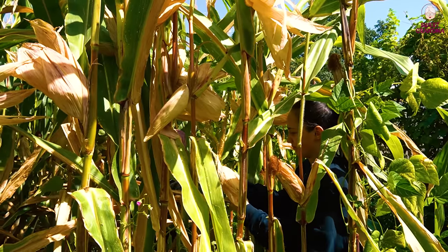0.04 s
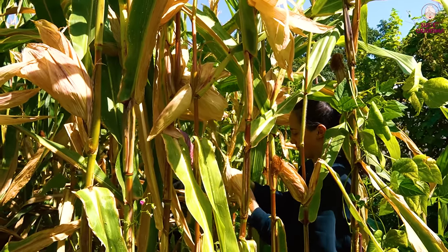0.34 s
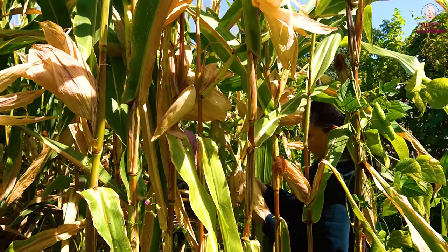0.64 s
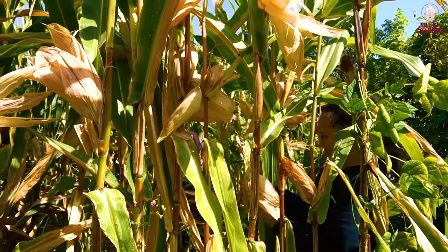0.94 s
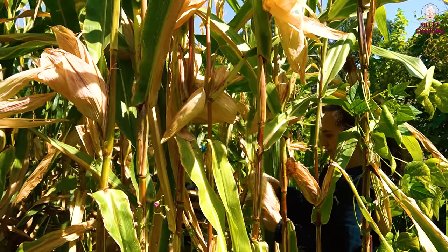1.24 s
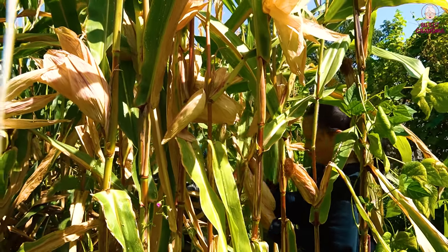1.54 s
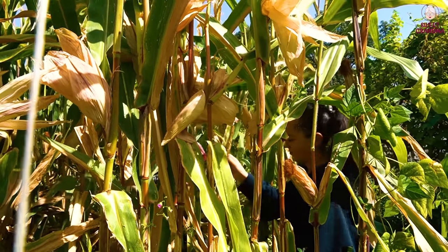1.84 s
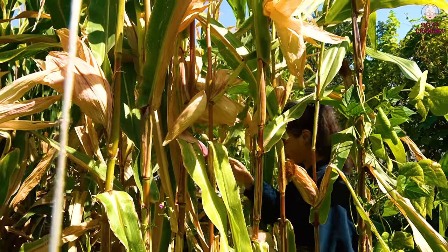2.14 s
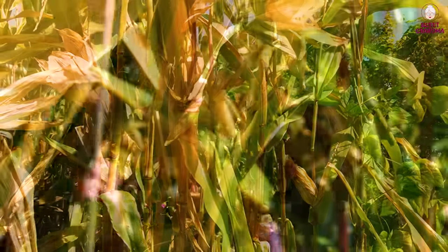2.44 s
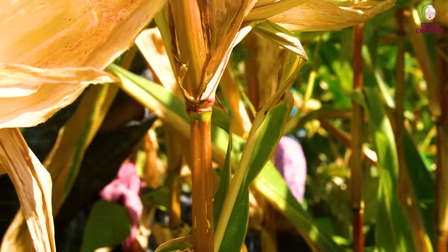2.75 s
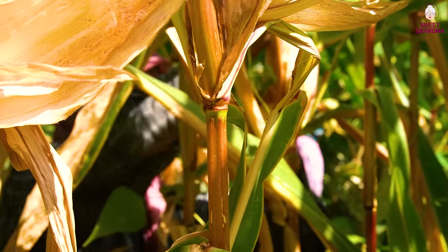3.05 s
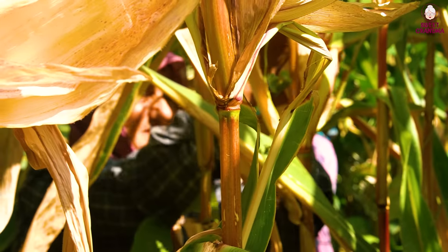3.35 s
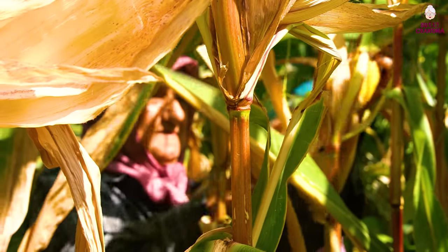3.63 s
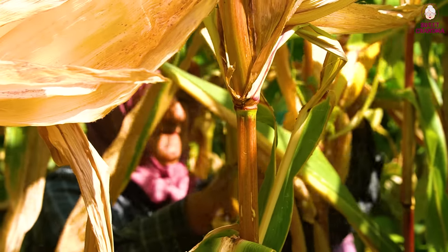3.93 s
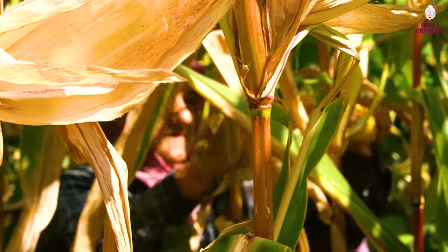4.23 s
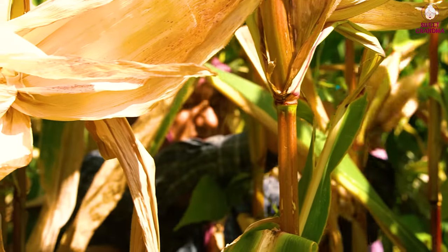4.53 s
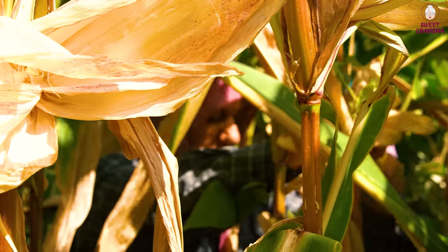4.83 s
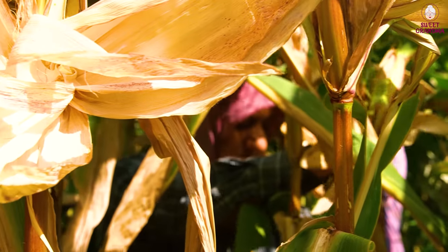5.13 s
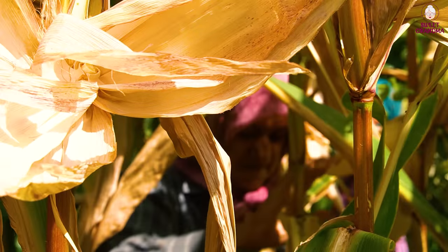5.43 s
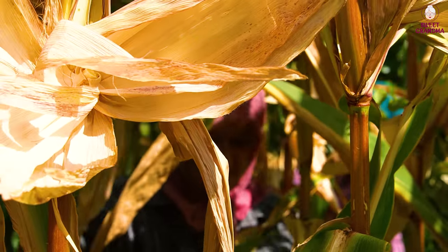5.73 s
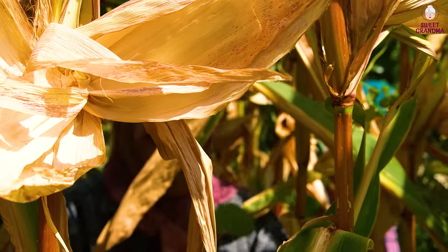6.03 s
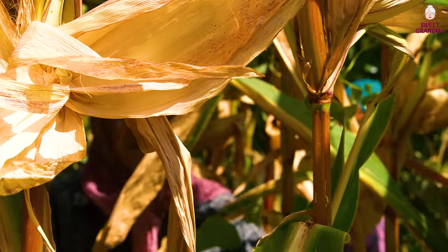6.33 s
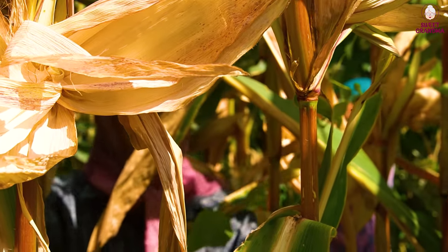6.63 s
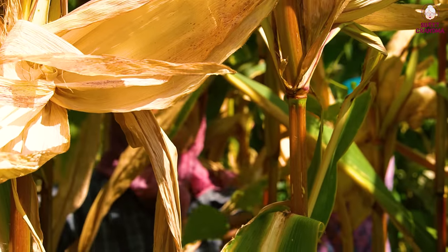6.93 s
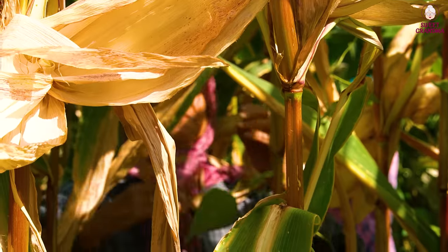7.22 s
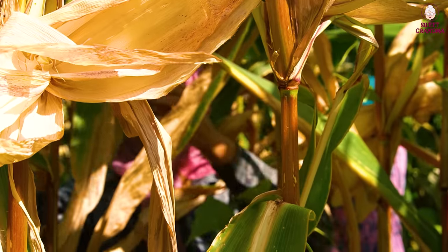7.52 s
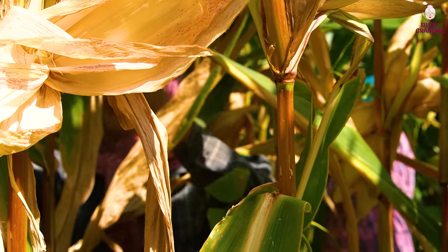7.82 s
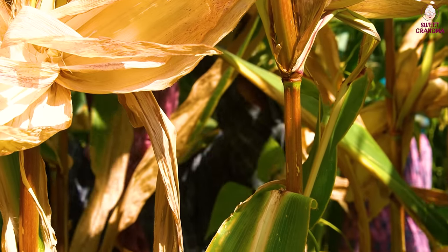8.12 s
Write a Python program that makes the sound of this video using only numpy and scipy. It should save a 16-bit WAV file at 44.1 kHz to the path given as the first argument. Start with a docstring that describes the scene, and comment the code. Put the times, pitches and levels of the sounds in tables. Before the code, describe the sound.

People push through dry maize close to the microphone for the whole eight seconds or so. Husks crunch, thin leaves crackle and stalks swish in short, uneven strokes, dotted with small sharp snaps. A soft, wide hiss and the low rumble of far traffic lie underneath. For the first two seconds small birds whistle close by, in quick, thin, high notes that stand out above the rustle and ring briefly among the plants. A distant engine hums up around 2.5 seconds and falls back by about 3.7. From about 4 seconds birds give short chips farther off, and after 6 seconds faint, distant whistles join them until about 7.5. From about 6.8 seconds to the end someone shifts about with several dull, padded bumps, while a low drone rises, peaks near 7.5 seconds and eases.

```python
"""In a field of dry maize, people pick their way past the microphone: husks crunch, leaves slide and
crackle, stalks swish and snap, over a soft hiss and the rumble of far traffic. For two seconds small
birds whistle close by, their notes scattered by plants and trees. A far engine swells around 3 s.
From about 4 s birds chip farther off, and after 6 s the whistles return, faint and distant. Toward
the end someone shifts about with dull bumps while a low drone rises and eases."""
import sys
import numpy as np
from scipy import signal
from scipy.fft import rfft, irfft, next_fast_len
from scipy.io import wavfile

SR = 44100
rng = np.random.default_rng(int(sys.argv[2]) if len(sys.argv) > 2 else 0)


def to_wav(sig):
    """Store sig (one row per channel, or 1-D mono) as 16-bit WAV at the path in sys.argv[1].

    Samples outside -1..1 are clipped; the rate is SR.
    """
    pcm = np.clip(np.atleast_2d(sig), -1, 1) * 32767
    pcm = np.round(pcm).astype(np.int16)
    wavfile.write(sys.argv[1], SR, pcm.T)  # frames by channels


N = 369116
TIME = np.arange(N) / SR

# The colour of each part of the plant, heard close. Each row: frequency in Hz, gain in dB.
STALK_COLOUR = [(150, 8.5), (300, -4.5), (700, 1), (1100, -1), (1800, -9), (4000, -26), (16000, -40)]
HUSK_COLOUR = [(400, -39), (1000, -12), (1600, 0.5), (2600, 0), (3200, 0), (4300, -2.5), (5600, -5),
               (9000, -5), (16000, -15)]
LEAF_COLOUR = [(800, -14), (2500, 1), (4200, 3), (6000, 1.5), (9000, 3.5), (12000, 2.5), (16000, 1)]
# Someone pushes or pulls at the plants. Each row: start in seconds, length in seconds,
# husk crunch in dB, leaf fizz in dB, growth from start to end in dB.
STROKES = [(0.133, 0.16, -48, -55, 0), (0.428, 0.11, -42, -48, 8), (0.628, 0.15, -45.5, -43.5, 2),
           (0.825, 0.21, -42.5, -49.5, 3.5), (1.121, 0.058, -45.5, -41, 2), (1.202, 0.16, -43, -46, -4),
           (1.383, 0.062, -41.5, -48, 0), (1.528, 0.084, -43, -49.5, 6), (1.726, 0.052, -41, -45, 6.5),
           (1.808, 0.089, -43.5, -41.5, 0.5), (2.132, 0.035, -50, -48.5, 9), (2.29, 0.17, -47, -52, 5),
           (2.51, 0.27, -42, -40.5, 4), (2.972, 0.036, -47, -56, -1), (3.098, 0.034, -68, -54, 3),
           (3.278, 0.26, -48, -48, -1.5), (3.519, 0.083, -41, -42.5, 3.5), (3.648, 0.079, -40, -40.5, -1),
           (3.77, 0.035, -51, -47, 2), (4.042, 0.043, -47, -55, -2), (4.165, 0.076, -44.5, -46.5, 2),
           (4.284, 0.1, -41.5, -40, 0), (4.448, 0.21, -41.5, -46, 0), (4.695, 0.1, -45, -48, -3),
           (4.91, 0.032, -43.5, -50, -1), (5.045, 0.037, -49.5, -54, 16), (5.272, 0.041, -42.5, -52, 5),
           (5.356, 0.11, -38, -41.5, 0), (5.583, 0.045, -41, -45, 3), (5.811, 0.066, -45, -42, 5.5),
           (5.927, 0.072, -46, -41, 5.5), (6.03, 0.13, -46.5, -44.5, 0), (6.307, 0.047, -46.5, -49, 3),
           (6.493, 0.23, -50, -50.5, 2), (6.846, 0.28, -48, -43.5, -1), (7.294, 0.093, -48, -46, 3.5),
           (7.473, 0.23, -50, -48.5, -10.5), (7.756, 0.053, -47, -46.5, -1), (8.039, 0.062, -53, -46.5, 0),
           (8.126, 0.29, -47.5, -42, -9)]
# How much the heavy stalks join in. Each row: time in seconds, level against the rustle in dB.
STALK_SHARE = [(0, -6), (1.8, -2), (2.7, -6.5), (4.6, -6), (6, -3), (7.3, -1.5), (8.37, 0)]
# Single breaks of dry fibre. Each row: start in seconds, relative peak in dB, centre in Hz,
# length in seconds.
SNAPS = [(0.133, -24, 9100, .012), (.4335, -23, 1880, .012), (0.549, -19, 2520, 0.012),
         (.5857, -26, 2600, .008), (.7897, -22, 1780, 0.0081), (0.938, -26.5, 1700, .012),
         (1.02, -25.5, 1800, 0.012), (1.216, -21, 1950, 0.011), (1.269, -19, 1940, 0.013),
         (1.666, -20, 1640, 0.015), (1.962, -24, 9000, 0.043), (2.496, -24.5, 1570, .01),
         (2.663, -22, 2900, .01), (2.776, -23, 3000, .014), (2.979, -24, 2200, 0.0071),
         (2.993, -29, 3000, .008), (3.356, -19, 11000, 0.011), (3.398, -27, 3490, .008),
         (3.511, -19, 11000, 0.013), (3.57, -21, 2400, 0.017), (3.731, -26, 3500, .008),
         (4.058, -25, 1600, 0.015), (4.204, -21, 3700, .008), (4.284, -21, 3840, .008),
         (4.63, -23, 3500, .011), (4.6805, -20, 3300, 0.0077), (4.836, -27.5, 2410, .008),
         (4.863, -21, 8050, 0.01), (4.956, -22.5, 4370, 0.0068), (5.07, -26.5, 2600, 0.018),
         (5.365, -21, 3230, .012), (5.607, -21.5, 2300, 0.012), (6.643, -25, 420, 0.013),
         (6.728, -22, 2150, .009), (7.318, -19, 5070, .022), (7.354, -20, 9000, 0.013),
         (7.502, -21, 3500, 0.009), (8.128, -28, 5900, .04)]
# Stiff leaves being bent. Each row: start in seconds, length in seconds, pitch in Hz,
# ring against the rustle in dB.
STIFF_LEAVES = [(2.48, .3, 1610, -10), (2.573, 0.27, 3100, -2), (2.64, .16, 4400, -6),
                (3.62, 0.14, 4150, -1), (4.206, 0.49, 4030, -8), (4.25, 0.67, 2200, -9),
                (4.94, .03, 4360, 1), (5.798, 0.16, 3400, -6), (8.12, .2, 2950, -8)]
# Bird whistles, loud and close at first, later faint and farther off. Each row: start in seconds,
# length in seconds, goal pitch in Hz, starting offset in Hz, relative peak in dB, attack in seconds,
# tremble as a share of the pitch, left over right in dB, lead of the left channel in radians.
WHISTLES = [(0, 0.024, 3896, -120, -12.5, 0.00084, 0.008, 1, -0.5),
            (0.124, 0.042, 3657, 118, -18.5, 0.017, 0.041, 0, 1),
            (.188, 0.029, 3700, 5, -22, .012, 0.016, 1, 1),
            (.292, 0.068, 3914, 338, -14.5, 0.011, 0.0093, -7, 1.5),
            (.39, 0.165, 2900, -330, -34, 0.15, 0.0086, -10, 2),
            (0.656, 0.097, 8000, -600, -6.5, 0.078, 0.0063, 2.5, 1.2),
            (0.766, 0.046, 8220, -100, -18, .003, 0.03, 10, 2.5),
            (0.829, 0.12, 7906, 40.5, -12, 0.11, 0.0065, 3, 0.4),
            (1.094, 0.084, 7910, -250, -9.5, 0.073, 0.0073, 6, 1),
            (1.31, 0.033, 6250, -2500, -7.5, 0.014, 0.017, 4, 2),
            (1.345, 0.072, 5500, -300, -13, 0.0036, 0.026, 5, 2),
            (1.426, 0.054, 7220, -320, -9, 0.02, 0.011, -5, -1.5),
            (1.62, 0.053, 4693, -120, -10.5, 0.046, 0.014, 9.5, 1.1),
            (1.697, 0.057, 6330, -16, -5.5, 0.02, 0.0085, 6.5, -2.5),
            (1.844, 0.069, 4380, 113, -10.5, 0.017, 0.004, 9, 0.2),
            (1.984, 0.054, 6660, 743, -11.5, 0.051, .009, -2, -1.5),
            (3.939, .08, 4400, 250, -44, .03, .012, 2, 1),
            (6.189, 0.044, 6550, 250, -27, 0.033, .03, 10, 4),
            (6.243, 0.041, 5980, -580, -30.5, 0.061, .012, 2, -3),
            (6.388, 0.064, 6770, -450, -33, 0.064, 0.015, 11, -3),
            (6.651, 0.19, 7910, -520, -26, 0.096, 0.01, 5, 1),
            (7.1, 0.076, 4430, 200, -38, 0.036, 0.011, 2, 4),
            (7.244, 0.053, 5200, 480, -44, 0.011, .025, 0, 0),
            (7.285, 0.056, 4400, 40, -37, .028, .012, 0, 1.5),
            (7.405, .06, 4650, 302, -44, .008, .025, 7, -1)]
# Contact calls from farther off. Each row: start in seconds, relative level in dB, length in seconds,
# centre pitch in Hz, sweep in Hz.
CHIPS = [(3.858, -22, 0.021, 7160, 2700), (3.979, -27.5, 0.026, 7250, 3986),
         (4.078, -26.5, .02, 7100, 2700), (4.351, -29, .022, 7110, 2800), (4.604, -26.5, 0.016, 7140, 2400),
         (6.06, -24, 0.025, 7130, 2300), (6.198, -25.5, 0.014, 7370, 3900),
         (6.312, -24.5, 0.014, 6460, 5000), (6.486, -18.5, 0.011, 7280, 4600)]
# The upward flick of a chip. Each row: share of its length, pitch from the centre as a share of the
# sweep, gain in dB.
CHIP_SHAPE = [(0, -0.56, -8), (.25, -0.145, 0), (.45, 0.0071, 0.5), (.75, .1, 0), (1, 0.47, -7)]
# Someone shifts about. Each row: time in seconds, peak in dB.
BUMPS = [(6.82, -33), (7.093, -31.5), (7.525, -28.5), (7.593, -29), (7.757, -30), (7.862, -31),
         (7.929, -33), (8.245, -31)]
# Scatter from the plants and trees all around. Each row: frequency in Hz, seconds to fall 60 dB at a
# stretch of 1.
FIELD_DECAY = [(300, 0.51), (2500, 0.36), (4500, 0.65), (7000, 0.6), (12000, 0.36)]
# The soft far hiss of the field. Each row: frequency in Hz, gain in dB.
AIR_COLOUR = [(180, 0.5), (300, 1.5), (476, -3.5), (863, 0), (1260, -3.5), (4420, -6.5), (9600, -10.5),
              (15500, -17)]
# The rumble of far traffic. Each row: frequency in Hz, gain in dB.
RUMBLE_COLOUR = [(15, -24), (28, -5.5), (50, -1), (80, -5), (115, -15), (150, -15.5), (200, -13.5),
                 (300, -22), (480, -34), (1000, -67)]
# A low drone, dead centre. Each row: time in seconds, level in dB.
DRONE_LEVEL = [(5, -51), (6.6, -45), (7.5, -32), (8.37, -39.5)]
# An engine in the distance. Each row: time in seconds, firing rate in Hz, overall gain in dB.
ENGINE_RUN = [(2.001, 44.82, -63), (2.55, 45.5, -39), (3.4, 46.7, -40), (3.75, 47.11, -49.5),
              (6, 47.33, -52)]
# That engine's orders. Each row: multiple of the firing rate, relative level in dB.
ENGINE_ORDERS = [(2, 2.5), (3, -1.5), (4, 1.5), (5, -9)]


def plants():
    """Close by, husks crunch in the midrange, thin leaves fizz on top and stalks swish with both."""
    husk_db, leaf_db = stroke_levels()
    stalk_db = (husk_db + leaf_db) / 2 + np.interp(TIME, *np.transpose(STALK_SHARE))
    stalk = crackle(per_s=1500, spread_db=3, span_hz=(303, 2470), cycles=.7, width_db=3, patches=14)
    husk = crackle(per_s=1800, spread_db=2.5, span_hz=(1253, 6150), cycles=2.8, width_db=1.5, patches=16)
    leaf = crackle(per_s=3500, spread_db=3, span_hz=(3660, 15200), cycles=.72, width_db=13.5, patches=24)
    stalk = rubbed(stalk, STALK_COLOUR, stalk_db, (350, 1200), slide_db=-3, wet_db=-11, flutter_db=1.5)
    husk = rubbed(husk, HUSK_COLOUR, husk_db, (1400, 3300), slide_db=2.5, wet_db=-9, flutter_db=1.5)
    leaf = rubbed(leaf, LEAF_COLOUR, leaf_db, (9500, 15500), slide_db=1, wet_db=-6.5, flutter_db=2)
    return (stalk + husk) * gain_of([[-.9], [.9]]) + leaf  # stalks and husks sit a little to the right


def stroke_levels(stir_db=-51.5, settle_s=.028):
    """Husk and leaf levels in dB: each stroke catches, grows or eases, and settles into a faint stir."""
    power = np.full((2, N), gain_of(stir_db) ** 2)
    for start, length, husk_db, leaf_db, growth_db in STROKES:
        catch_s = .024 * 2 ** (growth_db / 3)  # a stroke that grows also starts more gently
        t = TIME - start
        catch = np.exp(np.minimum(t, 0) / catch_s)
        hold = gain_of(growth_db * (np.clip(t / length, 0, 1) - .5))
        settle = np.exp(-np.maximum(t - length, 0) / settle_s)
        power += (gain_of([[husk_db], [leaf_db]]) * catch * hold * settle) ** 2
    hand_drag_db = .29 * drift(hz=14)
    return 10 * np.log10(power) + hand_drag_db


def crackle(per_s, spread_db, span_hz, cycles, width_db, patches):
    """Tiny fibre slips: uneven clicks ring patches of leaf, each with its pitch, place and busy spells."""
    out, t = np.zeros((2, N)), TIME[:256]
    knots = np.arange(0, TIME[-1] + .1, .025)
    for hz in np.geomspace(*span_hz, patches):
        busy = np.exp(.92 * rng.standard_normal(len(knots)))
        at = rng.integers(0, N, int(per_s * TIME[-1] / patches))
        size = gain_of(spread_db * np.minimum(rng.exponential(1, len(at)), 4))
        size *= rng.choice([-1, 1], len(at))
        clicks = np.bincount(at, size * np.sqrt(np.interp(at / SR, knots, busy)), N)
        ring = np.exp(-t * hz / cycles) * np.cos(2 * np.pi * hz * t)
        patch = np.sqrt(hz) * evened(np.convolve(clicks, ring)[:N])
        pan_db, lag = width_db * rng.uniform(-.82, 1), rng.integers(-1, 2)
        out += [gain_of(pan_db) * patch, gain_of(-pan_db) * np.roll(patch, lag)]
    return evened(out)


def rubbed(grains, colour, level_db, band_hz, slide_db, wet_db, flutter_db):
    """Crackle plus the hiss of sliding surfaces, catching and releasing, its level set within a band."""
    rustle = coloured(grains + gain_of(slide_db) * noise_pair(side_db=-6), colour)
    rustle *= gain_of(flutter_db * drift(hz=42))
    rustle += gain_of(wet_db) * scatter(rustle, stretch=.17)
    bandpass = signal.butter(4, band_hz, "bandpass", fs=SR, output="sos")
    return rustle / signal.sosfilt(bandpass, rustle.mean(0)).std() * gain_of(level_db)


def snaps():
    """A fibre breaks: one sharp crack and a quick splintering, coloured by the piece that broke."""
    out, t = np.zeros((2, N)), TIME[:4096]
    hz = np.fft.rfftfreq(len(t), 1 / SR)
    for start, db, centre_hz, length in SNAPS:
        splinters = noise_pair(side_db=-8.5, size=len(t)) * np.exp(-3 * t / length)
        splinters[:, 0] += 4.5  # the break itself
        resonance = 1j * hz * centre_hz / (centre_hz ** 2 - hz ** 2 + 1j * hz * centre_hz * .97)
        crack = irfft(rfft(splinters) * resonance * (resonance + .15))
        add(out, start, gain_of(db + .5) * crack / abs(crack).max())
    return out + gain_of(-22) * scatter(out, stretch=.3)


def with_stiff_leaves(rustle, fade_s=.02):
    """While a stiff dry leaf is bent, the slips and snaps ring its own narrow resonance."""
    out = rustle.copy()
    for start, length, hz, db in STIFF_LEAVES:
        bent = np.clip(np.minimum(TIME - start, start + length - TIME) / fade_s + .5, 0, 1)
        out += gain_of(db) * signal.lfilter(*signal.iirpeak(hz, Q=8, fs=SR), rustle * bent)
    return out


def whistles():
    """Thin, high whistles, close at first, later farther off; echoes beat and the field rings on."""
    out = np.zeros((2, N))
    for start, length, goal_hz, offset_hz, peak_db, attack, waver, pan_db, lead in WHISTLES:
        contour = whistle_contour(length, goal_hz, offset_hz, peak_db, attack)
        note = bird_note(contour, waver, waver_hz=108.8, throb_db=1.7)
        placing = gain_of([[pan_db / 2], [-pan_db / 2]]) * np.exp([[1j * lead], [0]])
        add(out, start, (placing * note).real)
        add_echoes(out, start, note, delay_s=(.008, .041), count=3, db=-13.5)
    return gain_of(-2) * out + gain_of(-10.5) * scatter(out, stretch=.85)


def whistle_contour(length, goal_hz, offset_hz, peak_db, attack, soft_start_db=-12, sag_db_per_s=77):
    """A whistle glides toward its goal, swells and sags. Each row: seconds, pitch in Hz, level in dB."""
    t = np.linspace(0, length, 24)
    glide_s = .0172 + .54 * attack  # the slower the swell, the slower the glide
    hz = goal_hz + offset_hz * np.exp(-t / glide_s)
    swell_db = soft_start_db * np.maximum(1 - t / attack, 0) ** 2
    db = peak_db + swell_db - sag_db_per_s * np.maximum(t - attack, 0)
    contour = list(zip(t, hz, db))
    if goal_hz > 7500:  # the highest notes close with a quick downward flick
        contour.append((length + .003, hz[-1] - 960, db[-1] - 1))
    return contour


def chips():
    """Buzzy flicks from birds farther off, doubled by near echoes and heard mostly by their scatter."""
    out = np.zeros((2, N))
    for start, db, length, centre_hz, sweep_hz in CHIPS:
        contour = [(share * length, centre_hz + bend * sweep_hz, db + rise)
                   for share, bend, rise in CHIP_SHAPE]
        note = bird_note(contour, waver=.049, waver_hz=744, throb_db=1.5)
        add(out, start, gain_of([[1.2], [-1.2]]) * note.real)  # a little to the left
        add_echoes(out, start, note, delay_s=(.0036, .016), count=2, db=-12.5)
    return gain_of(-6.5) * out + gain_of(-3) * scatter(out, stretch=.55)


def bird_note(contour, waver, waver_hz, throb_db, edge_s=.003):
    """A near-pure tone (complex-valued) along a contour, trembling unevenly in pitch and strength."""
    times, hz, db = np.transpose(contour)
    t = np.arange(times[0], max(times[-1], times[0] + .005), 1 / SR)
    knots = np.arange(t[0], t[-1] + 1 / waver_hz, .5 / waver_hz)
    tremble, throb = (np.interp(t, knots, rng.standard_normal(len(knots))) for _ in range(2))
    turns = np.cumsum(np.interp(t, times, hz) * (1 + waver * tremble)) / SR
    fade = np.sin(np.pi / 2 * np.clip(np.minimum(t - t[0], t[-1] - t) / edge_s, 0, 1))
    return fade * gain_of(np.interp(t, times, db) + throb_db * throb) * np.exp(2j * np.pi * turns)


def bumps(body_hz=275):
    """Padded knocks as someone shifts about: a short push of noise into one broad low resonance."""
    out, t = np.zeros((2, N)), TIME[:6000]
    body = signal.iirpeak(body_hz, Q=2.6, fs=SR)
    for at, db in BUMPS:
        push = noise_pair(side_db=-22, size=len(t)) * t * np.exp(-t / .014)
        bump = signal.lfilter(*body, signal.lfilter(*body, push))
        add(out, at - .004, gain_of(db) * bump / abs(bump).max())
    return out


def add_echoes(mix, start, note, delay_s, count, db):
    """Single near reflections of a note reach each side of the microphone at a random phase."""
    for delay in rng.uniform(*delay_s, count):
        phase = np.exp(2j * np.pi * rng.random((2, 1)))
        add(mix, start + delay, gain_of(db) * (phase * note).real)


def scatter(sound, stretch, taps_per_s=2500):
    """Diffuse reflections off plants and trees, each band dying at its own speed; stretch scales time."""
    taps = rng.standard_normal((2, SR)) * (rng.random((2, SR)) < taps_per_s / SR) * (TIME[:SR] > .004)
    hz, t, bands = signal.stft(taps, SR, nperseg=256)
    t60 = stretch * at_frequency(FIELD_DECAY, hz)[:, None]
    tail = signal.istft(bands * gain_of(-60 * t / t60), SR, nperseg=256)[1]
    return signal.fftconvolve(sound, tail / np.linalg.norm(tail[0]), axes=1)[:, :N]


def field_air():
    """The soft far hiss of the field, wide across the microphone."""
    return gain_of(-43.5) * evened(coloured(noise_pair(side_db=-1.8), AIR_COLOUR))


def far_traffic():
    """Distant traffic arrives as a low rumble, almost mono."""
    return gain_of(-37.5) * evened(coloured(noise_pair(side_db=-43), RUMBLE_COLOUR))


def drone(pitch_hz=87, width_hz=20):
    """A narrow band of low noise that rises near the end and eases again."""
    wander = drift(width_hz) + 1j * drift(width_hz)
    hum = (wander * np.exp(2j * np.pi * pitch_hz * TIME)).real
    return hum * gain_of(np.interp(TIME, *np.transpose(DRONE_LEVEL)))


def far_engine():
    """A distant engine swells briefly: unsteady tones at multiples of its firing rate."""
    times, firing_hz, db = np.transpose(ENGINE_RUN)
    turns = np.cumsum(np.interp(TIME, times, firing_hz) * (1 + .0041 * drift(hz=6.3))) / SR
    hum = np.zeros(N)
    for order, order_db in ENGINE_ORDERS:
        strength = gain_of(order_db + 2 * drift(hz=5.4))
        hum += strength * np.sin(2 * np.pi * (order * turns + rng.random()))
    return gain_of(np.interp(TIME, times, db)) * hum


def gain_of(db):
    """Decibels to amplitude."""
    return 10 ** (np.asarray(db) / 20)


def evened(sound):
    """Scales to rms 1."""
    return sound / np.sqrt(np.mean(sound ** 2) + 1e-20)


def at_frequency(table, hz):
    """Reads a table on a log-frequency axis."""
    table_hz, value = np.transpose(table)
    return np.interp(np.log(hz + 1), np.log(table_hz + 1), value)


def add(mix, start, sound):
    """Mixes in a stereo sound at a start in seconds."""
    part = mix[:, max(round(start * SR), 0):][:, :sound.shape[1]]
    part += sound[:, :part.shape[1]]


def coloured(sound, colour):
    """Filters a sound by a colour table."""
    size = next_fast_len(N, True)
    gain = gain_of(at_frequency(colour, np.fft.rfftfreq(size, 1 / SR)))
    return irfft(rfft(sound, size) * gain, size)[..., :N]


def drift(hz, size=4096):
    """A random wander of rms 1, with up to about hz changes a second."""
    rates = np.fft.rfftfreq(size, TIME[-1] / size)
    slow = irfft(rfft(rng.standard_normal(size)) / (1 + (rates / hz) ** 4))
    return evened(np.interp(TIME, np.linspace(0, TIME[-1], size), slow))


def noise_pair(side_db, size=N):
    """Mid-side stereo noise: a common part plus a weaker opposed part."""
    mid, side = rng.standard_normal((2, size))
    return evened(mid + gain_of(side_db) * np.array([side, -side]))


def scene():
    """The field from where the microphone stands: people in the maize, birds, then the distance."""
    people = with_stiff_leaves(plants() + snaps()) + bumps()
    birds = whistles() + chips()
    return people + birds + field_air() + far_traffic() + drone() + far_engine()


def record(dry):
    """The recorder behind the microphone cuts off the highest treble."""
    band_limit = signal.firwin(511, cutoff=15950, window=("kaiser", 9), fs=SR)
    return signal.oaconvolve(dry, band_limit[None], "same")


dry = scene()
out = record(dry)
to_wav(out)
```